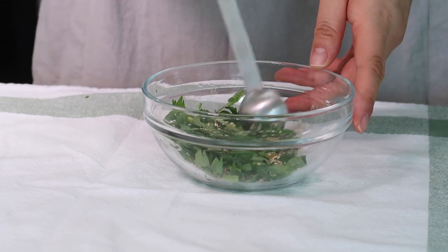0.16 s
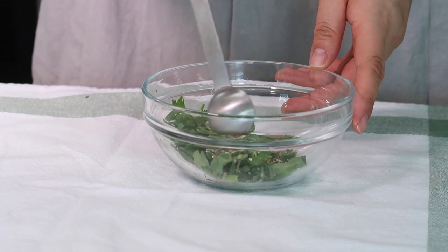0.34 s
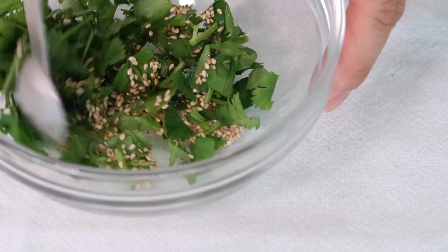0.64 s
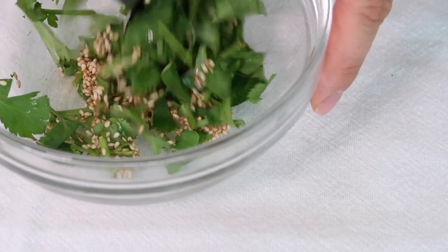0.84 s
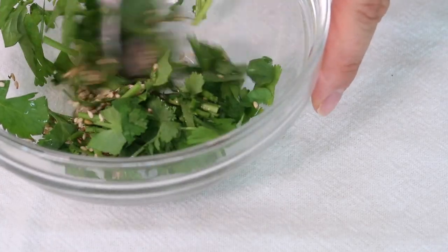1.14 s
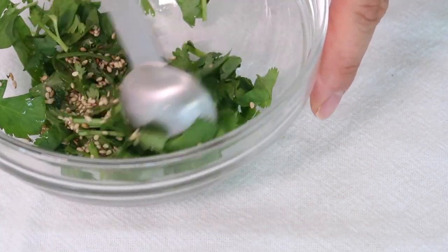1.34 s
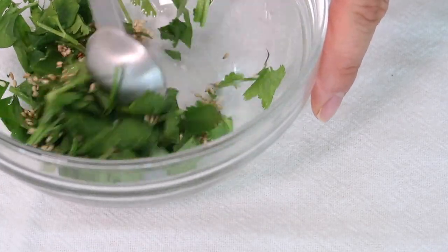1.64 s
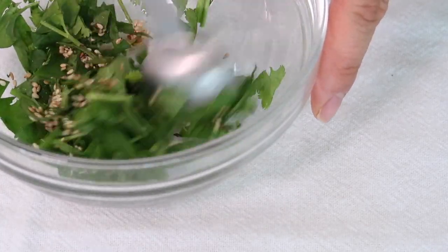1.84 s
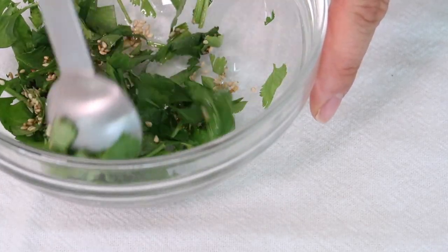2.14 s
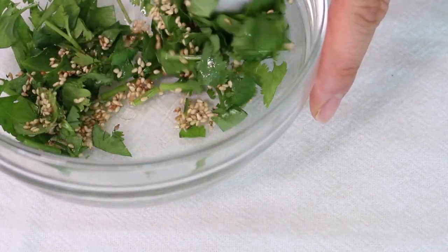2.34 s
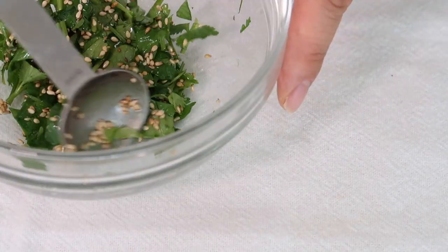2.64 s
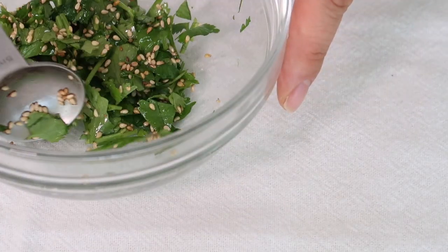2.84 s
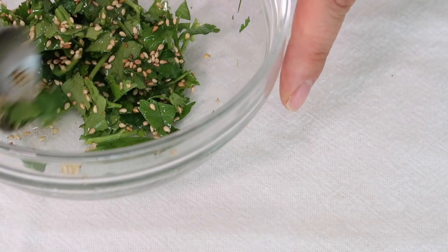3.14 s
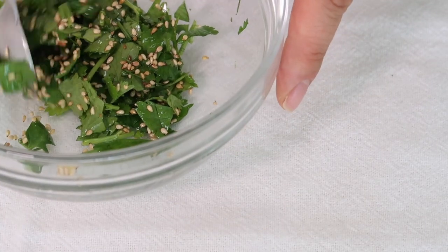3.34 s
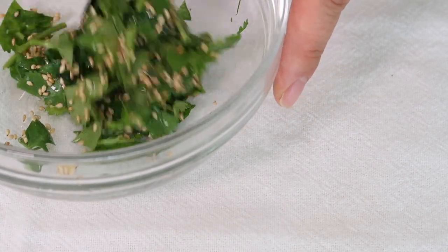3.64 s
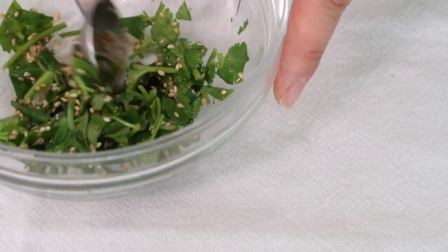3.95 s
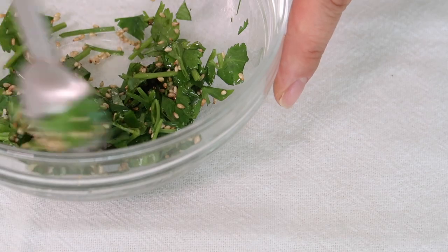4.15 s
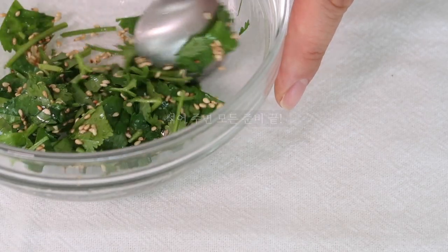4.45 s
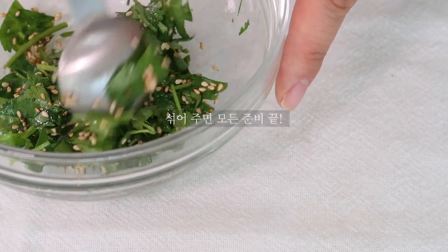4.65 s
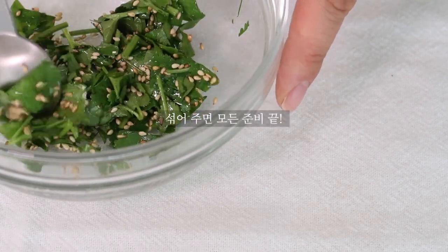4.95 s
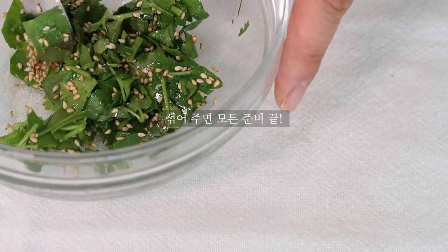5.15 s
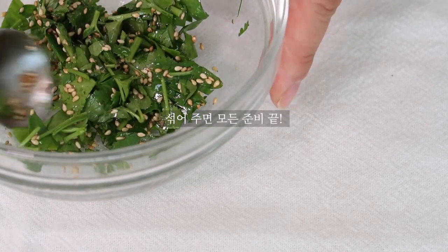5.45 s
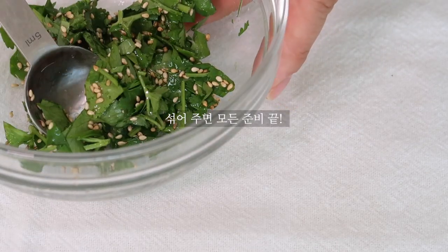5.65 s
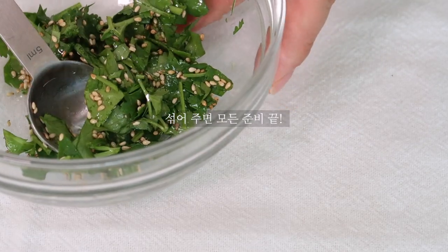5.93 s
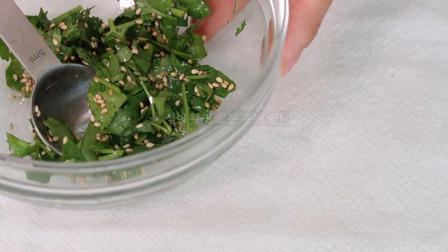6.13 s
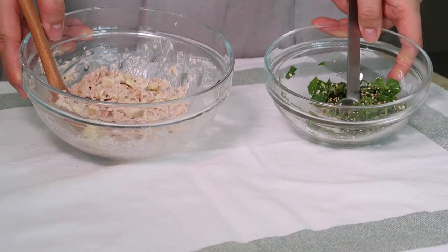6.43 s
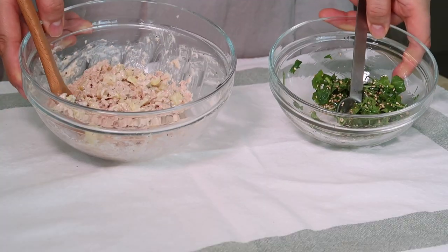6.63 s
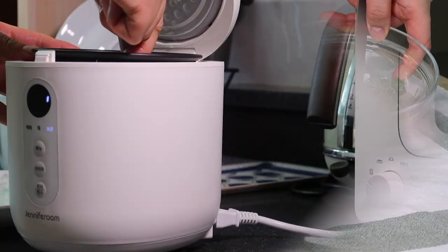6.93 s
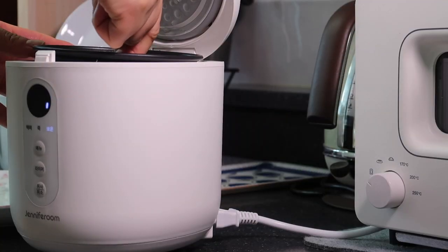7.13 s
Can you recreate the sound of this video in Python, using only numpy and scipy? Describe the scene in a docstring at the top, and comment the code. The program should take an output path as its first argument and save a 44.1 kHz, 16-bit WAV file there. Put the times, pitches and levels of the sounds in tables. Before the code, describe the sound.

A close stereo view of stirring herbs in a small glass bowl, in a kitchen with low appliance hum and soft air noise. From 0.3 to 1.9 s leaves rustle in crisp overlapping gusts, strongest around 1.5 to 1.7, with tiny dry seed ticks and faint bumps. At 1.9 the background abruptly drops. A steel spoon clinks dully at 2.1, then taps quickly and unevenly between 2.6 and 3.1, brighter glass rings among short cracks. A near pause holds only faint rustles and a weak tap at 3.6; a barely audible rub follows around 4.2. At 4.5 the room noise returns with the loudest, clear ringing clink. A short rustle, tick and bump come at 5.1, a muffled knock at 5.6, a brief chattering clink at 5.8, and a very faint tap at 6.3. Small ticks near 6.8 and soft table bumps from 7.0 to 7.25 end it.

```python
"""Leaves rustle first, over appliance hum and air noise; then a steel spoon clinks on a small glass bowl.
Each clink is a noisy crack and a dull knock, plus fading tones for the ringing glass and spoon.
Noise grains make the rustling leaves, short pings the seeds and stems, low tones the bumps on the table.
A faint rub is the gliding spoon. A kitchen echoes the clinks, bumps and ticks.
The room noise, made of filtered noise, drops away for a while in the middle."""
import sys
import numpy as np
from scipy import signal
from scipy.fft import rfft, irfft, next_fast_len
from scipy.io import wavfile
from scipy.ndimage import uniform_filter1d

SR = 44100
rng = np.random.default_rng(int(sys.argv[2]) if len(sys.argv) > 2 else 0)


def to_wav(s):
    """Save 16-bit WAV."""
    ch = np.atleast_2d(s).T  # columns
    pcm = np.round(np.clip(ch, -1, 1) * 32767)  # PCM
    wavfile.write(sys.argv[1], SR, pcm.astype(np.int16))


N = 321297
TIME = np.arange(N) / SR
SIDES = np.array([[.5], [-.5]])  # left and right: a value times this is shared out as left minus right

# main tones of the bowl; each lasting tone is a pair of close pitches that beat:
# (quick fade t60 [s], lasting fade t60 [s], lasting level [dB], left minus right [dB])
RING_FADES = [(0.21, 0.47, -5.5, -1.5), (0.029, 0.57, -3, 0.5), (0.12, 0.35, -8.5, 0),
              (0.05, 0.42, -18.5, 0)]
# pitch of each main tone: (pitch [Hz])
RING_HZ = [1015, 2436, 4289, 6478]
# distance between the two pitches of each pair: (split [Hz])
SPLIT_HZ = [12, 6.6, 5.5, 14]
# how far the left side leads in each main tone: (phase [radians])
LEFT_LEAD = [.25, .65, 1.3, 1.4]
# glass tones that sound along with each main tone: (level against that tone [dB], fade t60 [s])
NEIGHBOURS = [
    [(-15.5, 0.3), (-17, 0.36)],
    [(-8, 0.145), (-14.5, 0.28), (-7, 0.24), (-2.5, 0.16), (0, 0.39), (-9, 0.69), (-5.5, 0.31),
     (-21.5, 0.45), (-7.5, 0.1)],
    [],
    [],
]
# their pitches, a list for each main tone: (pitch [Hz])
NEIGHBOUR_HZ = [
    [987, 1087],
    [2116, 2190, 2300, 2390, 2452, 2468, 2512, 2565, 2770],
    [],
    [],
]


def bowl_rings(shares_db, lasting_db, near_db, lean_db, free):
    """The bowl rings in beating pairs of tones, with neighbours; leaves and hand change the fade times."""
    neighbours, main_rings = 0, 0
    for k, (quick, slow, pair_db, tilt_db) in enumerate(RING_FADES):
        hz, split, lead = RING_HZ[k], SPLIT_HZ[k], LEFT_LEAD[k]
        pair = sum(undb(way * lean_db[k]) * ring(hz + way * split, slow * free, lead)
                   for way in (-.5, .5))
        near = sum((-1) ** i * undb(db) * ring(near_hz, t60 * free, lead)
                   for i, (near_hz, (db, t60)) in enumerate(zip(NEIGHBOUR_HZ[k], NEIGHBOURS[k])))
        main = ring(hz, quick * free, lead) + undb(pair_db + lasting_db) * pair
        neighbours += undb(shares_db[k] + near_db[k] + tilt_db * SIDES) * near
        main_rings += undb(shares_db[k] + tilt_db * SIDES) * main
    return neighbours, main_rings


# short tones of the upper glass: (level [dB], fade t60 [s])
GLASS = [(-1, 0.046), (2, 0.036), (-0.5, 0.092), (1.5, 0.071), (5.5, 0.048), (-4.5, 0.064), (1, 0.048),
         (5.5, 0.055), (-18.5, .06), (0.5, 0.053)]
# their pitches: (pitch [Hz])
GLASS_HZ = [3150, 5100, 8890, 9650, 11560, 11920, 12590, 13130, 13400, 13900]
# short tones of the spoon: (level [dB], fade t60 [s])
SPOON = [(-11, 0.29), (-8.5, 0.097), (-23, .12), (-6.5, 0.091), (-6, .1), (-13.5, 0.122), (-8, 0.18),
         (-1, 0.069), (-0.5, .08), (11, 0.062), (4, 0.044), (3.5, 0.069), (-41, 0.0546), (-0.5, 0.074),
         (-14, 0.063)]
# their pitches: (pitch [Hz])
SPOON_HZ = [1190, 1690, 1940, 3850, 4240, 4470, 5020, 5700, 6020, 6890, 7920, 10200, 11240, 12050, 14700]
# pitches at which the struck spot raises or lowers the short tones: (pitch [Hz])
SPOT_HZ = [1190, 1800, 3150, 4300, 5100, 5850, 6890, 9000, 11500, 12900, 14700]


def short_modes(glass_db, spoon_db, favoured_db, free):
    """Glass and spoon ring briefly in many tones, each with a close twin; the struck spot favours some."""
    out = 0
    for pitches, table, group_db in ((GLASS_HZ, GLASS, glass_db), (SPOON_HZ, SPOON, spoon_db)):
        for hz, (mode_db, t60) in zip(pitches, table):
            scatter, lead, detune, twin_lead = rng.standard_normal(4)
            # higher tones reach the two sides further out of step
            tone = ring(hz, t60 * free, hz / 5000 * lead)
            twin = ring(hz * (1 + .01 * detune), t60 * free, hz / 5000 * twin_lead)
            spot_db = np.interp(hz, SPOT_HZ, favoured_db)
            gain = undb(group_db + mode_db + spot_db + 0.62 * scatter)
            out += np.sign(detune) * gain * (tone + .6 * twin)
    return out


BOUNCE_PER_S = 10.8  # a longer chatter bounces harder: largest size against the first contact, per s


def chatter_contacts(chatter_s):
    """The spoon chatters on the glass: one first contact, then 200 small bounces that weaken."""
    when, size = rng.random((2, 200))
    places = (when * chatter_s * SR).astype(int)
    contact = np.zeros(SR // 4)
    # cubing leaves most bounces tiny
    np.add.at(contact, places, BOUNCE_PER_S * chatter_s * (2 * size - 1) ** 3 * (1 - 1.01 * when))
    contact[0] = 1
    return contact


# colour of the crack: (pitch [Hz], level [dB])
CRACK = [(100, -61), (300, -36.5), (650, -20.5), (1200, -8), (2000, 4.5), (2600, 0), (3300, 0),
         (4500, -2.5), (8000, -18.5), (13000, -28), (14500, -15.5), (16000, -16)]
# colour of the dull knock: (multiple of the knock pitch, level [dB])
KNOCK = [(.15, -35.5), (.4, -14), (.7, -6.5), (1.0, -3.5), (1.3, -5.5), (2.0, -14), (3.5, -33), (7.0, -31),
         (20, -70)]
# blows of the spoon: (time [s], strength [dB], then levels against the strength: crack [dB], dull knock [dB],
#   main tones 1, 2, 3, 4 [dB], extra on their lasting part [dB], upper glass [dB], spoon [dB];
#   knock pitch [Hz], multiple of the fade times, chatter length [s])
CLINKS = [(2.078, -19, -2.5, -9, -42, -49, -52, -36, -4, -26, -20, 1060, 0.57, 0.0068),
          (2.631, -20.5, 0.5, -21.5, -26.5, -25, -27.5, -13, -1.5, -30.5, -35.5, 960, 1.48, 0.0047),
          (2.713, -32, -35, -17.5, -5, -35, -17, -28.5, -10, -54, -34, 930, 0.35, 0.0073),
          (2.836, -15, 0, -22, -21, -26, -17, -17, -2, -25, -34, 1010, 0.93, 0.0051),
          (2.896, -22, -1.5, -9.5, -22, -26.5, -40, -40.5, -2, -24, -12.5, 1090, 0.43, 0.014),
          (3.052, -13.5, -5, -32, -30, -24.5, -12.5, -10, -4, -26, -25.5, 680, 1.24, 0.0037),
          (3.623, -44, -26, -13, -17.5, -26, -10.5, -33, -5.5, -23, -36, 997, 0.33, 0.002),
          (4.507, -5.5, -6, -8.5, -11, -15, -7, -22.5, -7, -26.5, -32.5, 1910, 1.35, 0.0016),
          (5.585, -38.5, -24, -8.5, -3.5, -51, -40, -24, 0.5, -38, -16, 890, 0.13, 0.0098),
          (5.829, -19, -7.5, -24.5, -15.5, -16, -13, -9, 1.5, -18.5, -23.5, 1910, 0.7, .11),
          (6.336, -39, -14, -11, -30, -27, -27, -21, 12, -32, -26, 2500, 0.1, 0.0057)]
# what the struck spot favours, a row for each blow: (neighbours of main tones 1, 2 [dB],
#   upper minus lower half of pairs 1, 2, 3 [dB], short tones around the 11 pitches of SPOT_HZ [dB])
SPOT = [(0.1, 0.1, 0.1, 0.1, 0.1, 14, 11, 11, -12, -3, -3, -1.5, -1, -5.5, 0.1, 0.1),
        (9, -0.5, 0.1, 3, 9, 3, 0.1, -1, -1, 1.5, 2, 1, 0.1, -8, 5, 0.1),
        (2.5, -5, 6, 0.1, -2, 0.1, -1.5, -2, 0.1, 0.1, 0.1, 2, 0.1, 0.1, 2, 0.1),
        (-5, -3, 1, 1.5, 0.1, 0.1, -1, 2, 1, -4, -2, 1.5, 0.1, -3.5, 10.5, 0.5),
        (5, 1.3, -7.5, 0.1, 0.1, 5.5, -3, -2, 0, -6, -12, -1.5, -3, 0, -2, 0.1),
        (2, 0, -11.5, -1, -6, -3, -1, -1, 4, 5, 2, -5, 0.8, -5, -11, -3.5),
        (4, 1, -3, 0.1, 0.1, 0.1, 0.1, 0.1, 0.1, -3, 0.1, -4, -3, -3, 2, 0.1),
        (-9, -6, 4, 1, -6.5, 10, 3, 5.5, -6, -17, -14, -6.5, -0.3, -3, 0.1, -1.5),
        (1, 0.1, -1.4, 0.1, -3, 0.1, -5, -2, 0.1, 0.1, -1, 4.5, -3, -6, 0.1, 0.1),
        (0.1, -0.2, -14, -0.3, 2, -18, 3, -3.5, 11.5, -1, 5.5, -3.5, -1, 7.5, 0, -12),
        (-2, 0.1, 0.1, 0.1, 0.1, 0.1, 0.1, 0.1, 0.1, 0.1, 0.1, -2, 0.1, 0.1, 0.1, 0.1)]
SNAP = 4.2  # first contact of a crack against the noise after it
BOWL_PAN_DB = 0.7  # left minus right


def clinks():
    """Each blow cracks, then drives the rings of bowl and spoon as hard as the struck spot allows."""
    out = np.zeros((2, N))
    for blow, spot in zip(CLINKS, SPOT):
        s, strength_db, crack_db, knock_db, *shares_db = blow[:8]
        lasting_db, glass_db, spoon_db, knock_hz, free, chatter_s = blow[8:]
        near_db, lean_db, favoured_db = (*spot[:2], 0, 0), (*spot[2:5], 0), spot[5:]
        neighbours, main_rings = bowl_rings(shares_db, lasting_db, near_db, lean_db, free)
        short = neighbours + short_modes(glass_db, spoon_db, favoured_db, free)
        crack = burst(CRACK, .006, .3, SNAP)
        knock = burst([(k * knock_hz, db) for k, db in KNOCK], .06, .15)
        short[:, :crack.shape[1]] += undb(crack_db) * crack + undb(knock_db) * knock
        # the bounces keep the short sounds going; the main rings start once
        chattered = signal.fftconvolve(short, chatter_contacts(chatter_s)[None])
        sound = chattered[:, :main_rings.shape[1]] + main_rings
        add(out, s, undb(strength_db + BOWL_PAN_DB * SIDES) * sound)
    # the clinks carry no bass below about 400 Hz
    high_pass = signal.butter(N=2, Wn=400, btype="high", fs=SR, output="sos")
    return signal.sosfilt(high_pass, out)


# tones of the table: (pitch [Hz], fade t60 [s])
TABLE = [(143, 0.24), (328, 0.14), (680, 0.106)]
# dull bumps on the table: (time [s], then the level of each table tone before the soft push [dB])
BUMPS = [(0.692, -73, -70, -56), (.708, -70, -66, -43), (2.078, -46.5, -87, -70), (2.507, -61, -50, -72),
         (2.719, -52, -75, -72), (2.9, -52.5, -37, -59), (5.061, -42, -31.5, -48), (5.583, -36.5, -40, -60),
         (5.827, -39.5, -44, -56), (7.01, -63, -59, -51), (7.087, -53, -38, -43), (7.12, -66, -43, -47),
         (7.244, -60, -36.5, -30.5)]


def bumps():
    """The bowl, and later a pot, knocks the cloth-covered table: a soft push sets off its low tones."""
    out = np.zeros((2, N))
    push = np.hanning(int(0.0024 * SR))  # 2.4 ms long
    for s, *levels_db in BUMPS:
        tones = sum(undb(db) * ring(hz, t60) for db, (hz, t60) in zip(levels_db, TABLE))
        add(out, s, signal.fftconvolve(tones, push[None] / push.sum()))
    return out


# small dry ticks: (time [s], peak level [dB], pitch [Hz], width [Hz])
TICKS = [(0.586, -41, 2560, 2500), (.677, -42, 7550, 2500), (0.705, -44, 6060, 600), (.77, -47, 9000, 4000),
         (.958, -48, 4100, 400), (1.527, -43.5, 4100, 500), (2.499, -59, 12100, 1970),
         (5.057, -38.5, 10700, 3970), (6.758, -40, 3850, 696), (6.774, -52, 3950, 500)]


def ticks():
    """Seeds and stems tick: a quickly dying bit of noise in a band makes each ping."""
    out = np.zeros((2, N))
    t = np.arange(SR // 20) / SR
    for s, db, hz, width in TICKS:
        band = signal.butter(N=2, Wn=[hz - width / 2, hz + width / 2], btype="band", fs=SR, output="sos")
        dying_noise = rng.standard_normal((2, len(t))) * np.exp(-t / 0.0059)
        ping = signal.sosfilt(band, dying_noise)
        add(out, s, undb(db) * ping / np.abs(ping).max())
    return out


# colour of the rustle: (pitch [Hz], level [dB])
LEAF = [(500, -15), (1500, -11.5), (3000, 0.5), (5000, -1.5), (8000, -3.5), (12000, -6), (14500, -6),
        (16000, -34.5)]
# the spoon tosses the leaves: (time of the peak [s], level at the peak [dB], swell [s], fade [s])
TOSSES = [(.02, -67, .05, 0.14), (.31, -57, 0.21, 0.4), (.68, -55, 0.022, 0.25), (.77, -54.5, 0.16, 0.74),
          (.9, -59, .3, .28), (1.18, -54, 0.046, 0.12), (1.26, -57.5, 0.22, 0.096), (1.48, -51, 0.068, .09),
          (1.67, -49.5, 0.033, 0.12), (1.72, -55.5, .1, 0.049), (1.89, -64, 0.091, 0.085),
          (2.33, -82, .08, 0.22), (2.5, -65, 0.024, 0.067), (3.371, -65, 0.024, 0.043),
          (3.62, -66, .03, .07), (3.72, -81, 0.19, 0.31), (4.04, -60.5, .05, 0.028),
          (4.321, -66.5, .035, .045), (5.059, -50, 0.022, 0.053), (5.24, -71, 0.53, .11),
          (5.59, -56, 0.057, 0.071)]


def leaves():
    """Dense tiny crackles of uneven size, a gust with each toss."""
    sizes = undb(3.13 * rng.exponential(size=N))
    present = rng.random(N) < .1  # one sample in ten crackles
    grains = rng.standard_normal((2, N)) * sizes * present
    rustle = level(signal.fftconvolve(grains, causal(LEAF)[None])[:, :N], 0)
    gusts_db = np.max([db + swell_db(s, rise, fall) for s, db, rise, fall in TOSSES], axis=0)
    return rustle * undb(gusts_db + 2.0 * walk(35.04))


# bands stirred by the gliding spoon: (pitch [Hz], width [Hz])
SLIDE_BANDS = [(2550, 68), (2900, 220)]
SLIDE_S, SLIDE_LENGTH_S, SLIDE_DB = 4.16, 0.28, -75
SLIDE_SWELL_S, SLIDE_FADE_S = 0.089, .03


def slide():
    """The spoon glides along the wall: faint uneven rubbing stirs two narrow bands."""
    rub = rng.standard_normal((2, N)) * undb(3.7 * walk(60))
    bands = sum(colour(rub, lambda f: resonance(f, hz, width)) for hz, width in SLIDE_BANDS)
    shape_db = swell_db(SLIDE_S, SLIDE_SWELL_S, SLIDE_FADE_S, SLIDE_LENGTH_S)
    return level(bands, SLIDE_DB) * undb(shape_db)


# echo of the kitchen: (pitch [Hz], fade t60 [s], level [dB])
KITCHEN = [(201, 0.13, -8.5), (636, 0.27, -1.5), (1498, 0.61, -4.5), (2780, 0.56, -11), (5675, 0.38, -11),
           (9700, 0.43, -12), (14200, 0.11, -16.5)]


def kitchen(x):
    """Diffuse echo: noise with its own fade time at each pitch, building up over the first 5.2 ms."""
    t = np.arange(SR // 2) / SR
    noise = rng.standard_normal((2, len(t)))
    echo = 0
    for octave in np.arange(-2, 5.5, .5):
        hz = 500 * 2 ** octave
        t60, db = (on_log(np.array(KITCHEN)[:, [0, k]], hz) for k in (1, 2))
        # left and right differ more in the treble
        stereo = noise[0] + min(hz / 2600, 2) * SIDES * noise[1]
        band = colour(stereo, lambda f: np.cos(np.pi * np.clip(np.log2(f / hz + 1e-9), -.5, .5)) ** 2)
        fade = 1000. ** (-t / t60) * np.clip(t / 0.0052, 0, 1)
        echo = echo + undb(db) * band * fade / np.sqrt(np.sum(fade ** 2))
    return signal.fftconvolve(x.mean(0)[None], echo)[:, :N]


# colour of the air noise: (pitch [Hz], relative level per Hz [dB])
AIR = [(18, -35.5), (30, -3), (170, -4.5), (204, -7.5), (239, -8.5), (394, -6), (486, -9.5), (569, -11.5),
       (2480, -25.5), (4080, -30.5), (9220, -42), (13700, -49), (16000, -54.5)]
# hum bands: (pitch [Hz], width [Hz], level before the changes in ROOM [dB])
HUM = [(58.8, 9.8, -62), (121.1, 3.3, -68.5), (175.2, 24, -65), (234.7, 19, -62), (366, 3.3, -64.5),
       (479.3, 7.06, -71.5), (9140, 13.6, -79.5)]
# the room noise changes abruptly: (start time [s], air level [dB], change of the hum [dB],
#   treble tilt above 500 Hz [dB per octave])
ROOM = [(0, -53.5, 0, 2.5), (1.911, -65, -11.5, 3), (4.458, -53.5, -2, 2.21), (5.9, -52, 3.5, 2.03),
        (6.898, -52.5, -1.5, 1.82)]
STEP_S = 0.0073  # time each change takes
# the air noise swells or dips for a moment: (time [s], level change [dB],
#   extra treble tilt [dB per octave], lead-in [s], lead-out [s])
SWELLS = [(0, 5.5, 2, .05, 0.17), (.7, 7.5, -1.5, 0.057, 0.13), (1.9, 1, 0.6, 0.55, 0.017),
          (3.3, -4.5, 0.5, 0.48, 0.75), (5.1, 4, -0.2, 0.2, 0.68)]
# rumble in the lowest air bands, below roughly 90 Hz: (time [s], level change [dB])
RUMBLE = [(0, -6), (.3, 6), (.75, -1), (1.2, 4.5), (1.9, -9), (2.6, 1.5), (3.3, -13), (4.05, 3),
          (4.45, -10), (5.6, 1.5), (6.3, -1), (6.9, 6), (7.29, 9)]


def room_noise():
    """Air noise in octave bands that flicker apart, and appliance hum as narrow bands of noise."""
    starts, *columns = np.transpose(ROOM)
    row = np.searchsorted(starts[1:], TIME)
    air_db, hum_db, tilt_db = (uniform_filter1d(c[row], int(STEP_S * SR) + 1) for c in columns)
    for s, db, tilt, rise, fall in SWELLS:
        shape = np.interp(TIME, [s - rise, s, s + fall], [0, 1, 0])
        air_db, tilt_db = air_db + db * shape, tilt_db + tilt * shape
    rumble_db = np.interp(TIME, *np.transpose(RUMBLE))
    air = level(colour(wide_noise(), lambda hz: undb(on_log(AIR, hz))), 0)
    out = 0
    for octave in range(-4, 6):  # counted from 500 Hz
        band = colour(air, lambda hz: np.cos(
            np.pi / 2 * np.clip(np.log2(hz / 500 + 1e-9) - octave, -1, 1)) ** 2)
        band_db = air_db + tilt_db * max(octave, 0) + rumble_db * (octave < -2)
        out = out + band * undb(band_db + 0.12 * walk(2.5))
    noise = wide_noise()
    for hz, width, db in HUM:
        hum = level(colour(noise, lambda f: resonance(f, hz, width)), db)
        out = out + undb(hum_db) * hum
    return out


# likeness of left and right, kept within 0 to 1 when used: (pitch [Hz], likeness)
ALIKE = [(30, 3), (75, 0.5), (130, 1.1), (290, 0.5), (640, 0.29), (1410, 0.04), (3100, 0.01), (6820, -6.5),
         (15000, -1.5)]


def wide_noise():
    """Noise alike left and right in the bass, unrelated in most of the treble."""
    mid, side = rng.standard_normal((2, N))
    alike = lambda hz: np.clip(on_log(ALIKE, hz), 0, 1)
    shared = colour(mid, lambda hz: np.sqrt(1 + alike(hz)))
    opposed = colour(side, lambda hz: np.sqrt(1 - alike(hz)))
    return shared + 2 * SIDES * opposed


def undb(db):
    """Turn decibels into a plain factor."""
    return 10 ** (np.asarray(db) / 20)


def level(x, db):
    """Scale a sound to an average (RMS) level in dB."""
    return x * undb(db) / np.sqrt(np.mean(x ** 2))


def on_log(table, hz):
    """Read a (pitch [Hz], value) table on a log axis."""
    table = np.array(table, float)
    return np.interp(np.log(hz + 1), np.log(table[:, 0]), table[:, 1])


def colour(x, gain_of_hz):
    """Filter the last axis by a gain curve."""
    size = next_fast_len(x.shape[-1])
    hz = np.arange(size // 2 + 1) * SR / size
    return irfft(rfft(x, size) * gain_of_hz(hz), size)[..., :x.shape[-1]]


def resonance(f, hz, width):
    """Gain of a narrow peak, halved at half the width from its centre."""
    return 1 / (1 + ((f - hz) / width * 2) ** 2)


def causal(table, size=512):
    """Short filter with the colour of a (pitch [Hz], level [dB]) table that acts at once (minimum phase)."""
    hz = np.arange(size + 1) * SR / 2 / size
    cepstrum = irfft(np.log(undb(on_log(table, hz))))
    # folding the cepstrum moves the energy to the start
    cepstrum[1:size] *= 2
    cepstrum[size + 1:] = 0
    return irfft(np.exp(rfft(cepstrum)))[:size]


def ring(hz, t60, lead=0.):
    """A tone that fades by 60 dB in t60 seconds, two channels, cut off after 0.8 s at most."""
    t = np.arange(int(SR * np.clip(t60, .005, .8))) / SR
    out = np.zeros((2, int(.8 * SR)))
    out[:, :len(t)] = np.sin(2 * np.pi * hz * t + lead * SIDES) * 1000. ** (-t / t60)
    return out


def burst(table, t60, apart, snap=0.):
    """A dying noise burst in the given colour, starting near 1; partly unrelated left and right."""
    t = np.arange(SR // 10) / SR
    mid, side = rng.standard_normal((2, len(t)))
    mid[0] += snap
    dying = (mid + 2 * apart * SIDES * side) * 1000. ** (-t / t60)
    sound = signal.fftconvolve(dying, causal(table)[None])
    # a decay of t60 holds the energy of t60 / (2 ln 1000) at full level
    return sound / np.sqrt(np.sum(sound ** 2) / 2 / (t60 * SR / 2 / np.log(1000)))


def walk(rate):
    """Random levels held 1 / rate s and smoothed twice."""
    k = int(SR / rate)
    steps = np.repeat(rng.standard_normal(N // k + 1), k)
    return uniform_filter1d(uniform_filter1d(steps, k), k)[:N]


EDGE_DB = 28  # level lost over a swell or a fade


def swell_db(s, rise, fall, hold=0.):
    """0 dB at the peak, falling in straight dB lines on both sides."""
    before = (s - TIME) / rise
    after = (TIME - s - hold) / fall
    return -EDGE_DB * np.maximum(0, np.maximum(before, after))


def add(out, s, sound):
    """Mix a sound in at time s."""
    i = int(s * SR)
    out[:, i:i + sound.shape[1]] += sound[:, :N - i]


def scene():
    """Near sounds with their echo, over rustle, rubbing and room noise."""
    near = clinks() + bumps() + ticks()
    return near + kitchen(near) + leaves() + slide() + room_noise()


def record(dry):
    """Round the loudest peaks, soften the treble from 14 kHz and cut it steeply above 16 kHz."""
    rounded = .85 * np.tanh(dry / .85)
    soft = signal.sosfilt(signal.butter(N=2, Wn=14000, fs=SR, output="sos"), rounded)
    return signal.sosfilt(signal.ellip(10, .2, 100, 16000, fs=SR, output="sos"), soft)


dry = scene()
out = record(dry)
to_wav(out)
```